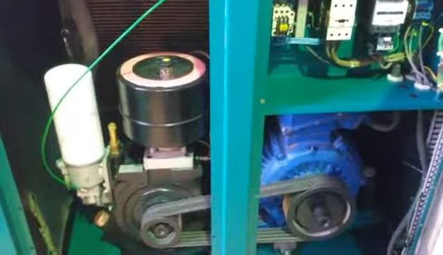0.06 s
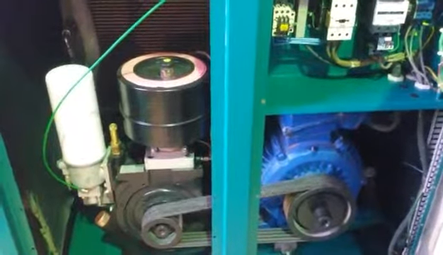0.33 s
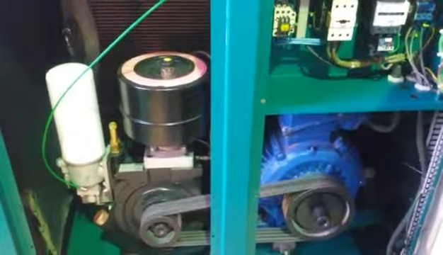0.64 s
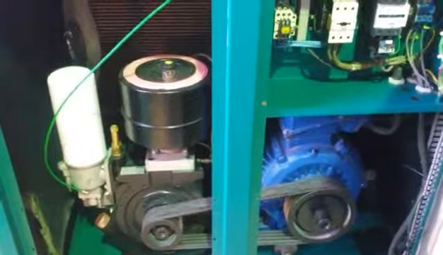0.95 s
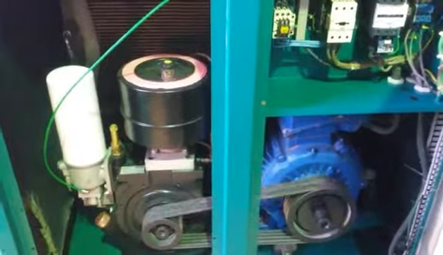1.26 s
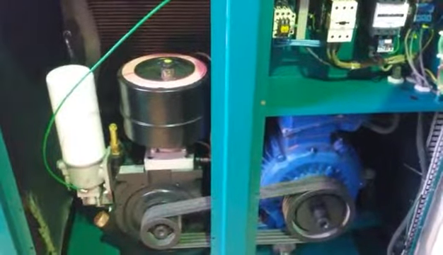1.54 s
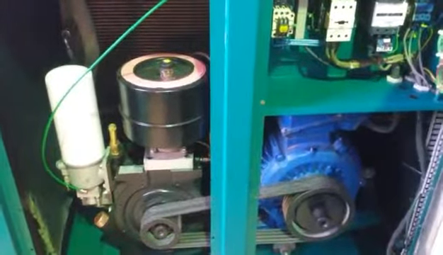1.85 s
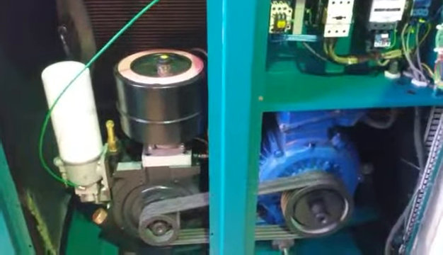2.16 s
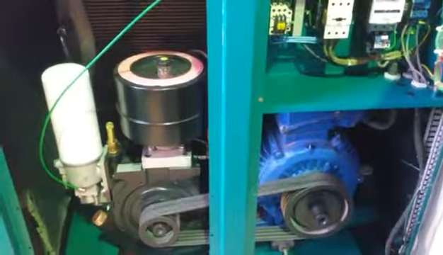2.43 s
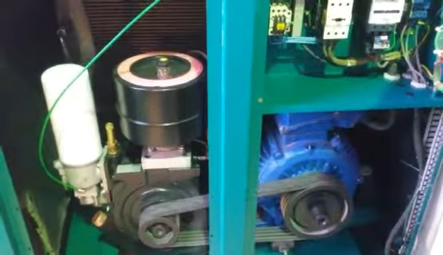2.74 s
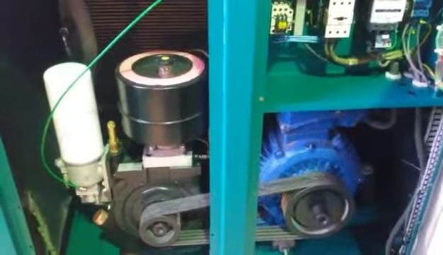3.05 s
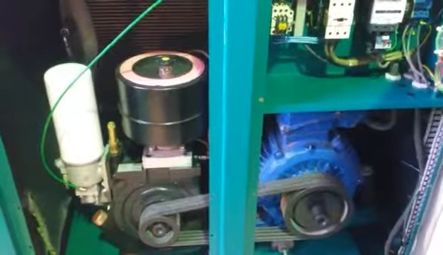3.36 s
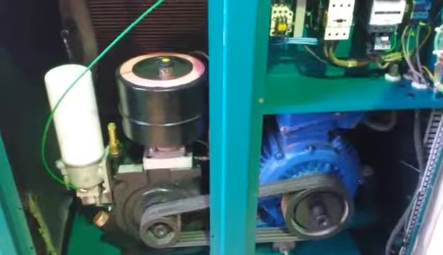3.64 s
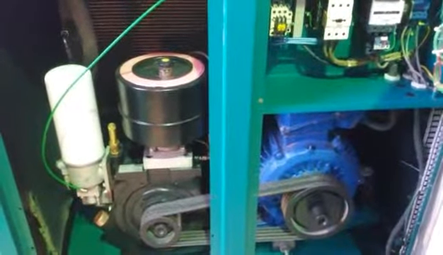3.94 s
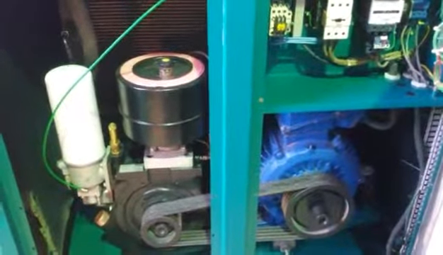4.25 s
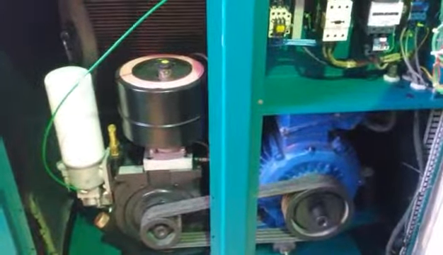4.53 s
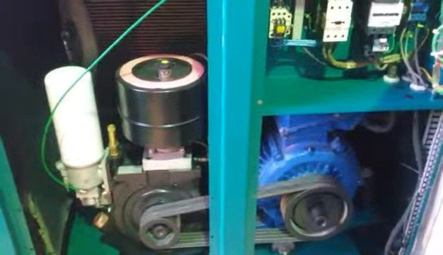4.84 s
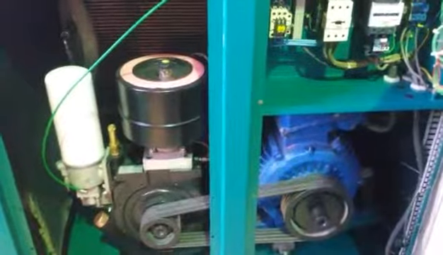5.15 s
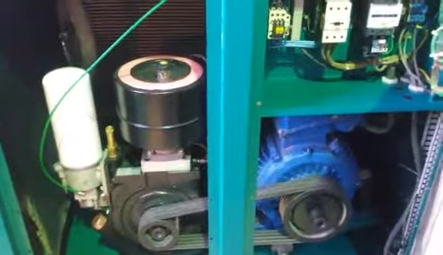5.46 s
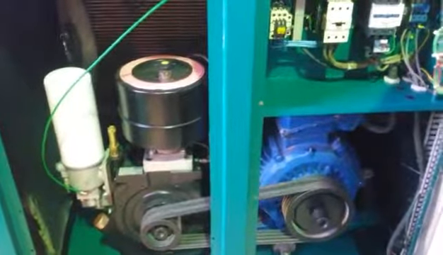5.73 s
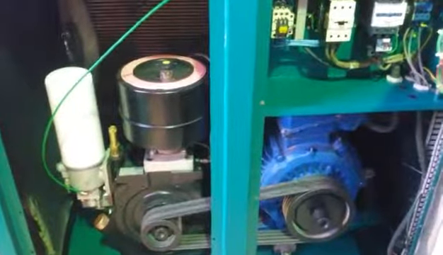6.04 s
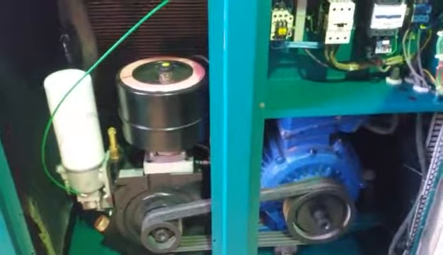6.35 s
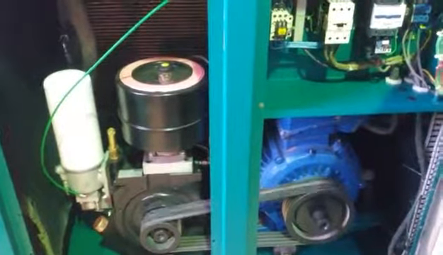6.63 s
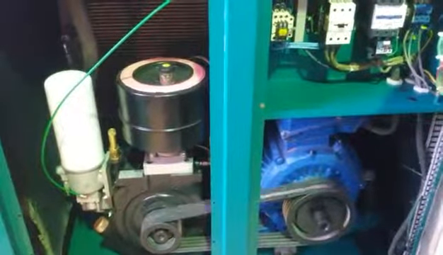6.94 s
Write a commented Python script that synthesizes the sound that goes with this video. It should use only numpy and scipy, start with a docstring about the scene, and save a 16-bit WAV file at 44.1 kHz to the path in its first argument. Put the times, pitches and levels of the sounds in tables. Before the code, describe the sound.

From the start, a belt-driven air compressor runs loudly and steadily in an open steel cabinet, heard from nearby. A firm mid-pitched drone sits under a piercing high whine that throbs slightly, about four times a second. Beneath them are a softer motor hum and the constant rush of fan and air. Nothing much changes until about 5.7 seconds, when a power switch opens with one sharp clack and a short ring from the metal walls. The steady drone drops away at once and the machine begins to spin down. Its tones and whine glide lower, swelling and dipping as they fall, while the rotors take on a rough chatter. From about 6.6 seconds the falling tone sets the cabinet booming. The machine is still slowing at 7 seconds.

```python
"""An air compressor switches off

A belt-driven screw compressor runs in an open steel cabinet. The ridges (lobes) of its rotors pump out a steady
tone, and rotors, bearings and motor whine over the rush of fan and air. A power switch clacks open; everything
slows down, and the falling tone sets the cabinet booming."""
import sys
import numpy as np
from scipy import signal
from scipy.fft import rfft, irfft, next_fast_len
from scipy.io import wavfile
from scipy.ndimage import map_coordinates

SR = 44100
rng = np.random.default_rng(int(sys.argv[2]) if len(sys.argv) > 2 else 0)


def unload_audio(sound):
    """Save the sound as a 16-bit wav file, at the path given as the first command line argument."""
    columns = np.transpose(np.atleast_2d(sound))
    # keep every value between -1 and 1, then stretch to whole-number steps
    steps = np.round(np.clip(columns, -1, 1) * 32767)
    wavfile.write(sys.argv[1], SR, steps.astype(np.int16))


N = 308259
T = np.arange(N) / SR
FULL_SPEED_HZ = 441.06  # lobes passing the outlet each second
MESH_ORDER = 9.4  # pitch of the interlocking (meshing) rotors, as a multiple of the lobe rate


def gain_of(db):
    return 10 ** (np.asarray(db) / 20)


def unit_level(x):
    return x / np.sqrt(np.mean(x ** 2) + 1e-20)


def curves(rows):
    """Join a table's points with straight lines in time, one curve per column."""
    times, *columns = np.transpose(rows)
    return [np.interp(T, times, column) for column in columns]


def wander(hz):
    """A smooth random wobble that changes about hz times a second."""
    knots = rng.standard_normal(1000)
    return unit_level(map_coordinates(knots, [T * hz], order=2, mode="mirror"))


def resonate(x, hz, width_hz):
    """Ring at one pitch; a narrower width rings longer."""
    r = np.exp(-np.pi * width_hz / SR)
    return 2 * signal.lfilter([1 - r], [1, -r * np.exp(2j * np.pi * hz / SR)], x).real


def echoes(x, wet, t60):
    """Add echoes from the steel walls, fading by 60 dB in t60 seconds."""
    t = T[:SR // 2]
    tail = rng.standard_normal(len(t)) * gain_of(-60 * t / t60) * (t > .003)
    return (x + wet * signal.fftconvolve(x, tail / np.linalg.norm(tail))[:N]) / np.hypot(1, wet)


def tones(rows, rotation, waver_db, slip):
    """Tones that follow a rotation, each wavering in level and slipping a little in phase."""
    return sum(gain_of(db + waver_db * wander(9)) * np.sqrt(2)
               * np.sin(2 * np.pi * (rate * rotation + rng.random()) + slip * wander(7))
               for rate, db in rows)


def rush(spectrum, flutter_db):
    """Shaped rushing noise that flutters slightly."""
    hz, db = np.transpose(spectrum)
    size = next_fast_len(N)
    colour = gain_of(np.interp(np.log(np.fft.rfftfreq(size, 1 / SR) + 1), np.log(hz), db))
    air = irfft(rfft(rng.standard_normal(size)) * colour, size)[:N] * np.sqrt(SR / 2)
    return air * gain_of(flutter_db * wander(25))


def fan_and_air(load, swell):
    """The rush of fan and air changes colour as the load comes off."""
    # steady rushing noise, its treble cut away around 10 kHz: f/Hz, level/dB per Hz
    steady = [(25, -80), (48, -73.5), (72, -54.5), (300, -55), (440, -57), (600, -62), (800, -60.5),
              (1120, -57.5), (2100, -61.5), (2700, -65.5), (5200, -61.5), (7300, -72), (9200, -74),
              (10300, -98), (11800, -88), (12600, -79), (13500, -110)]
    # rushing noise while slowing: f/Hz, level/dB per Hz
    slowing = [(25, -78), (50, -76), (75, -59), (130, -50.5), (200, -59.5), (380, -53), (680, -70),
               (880, -58.5), (1300, -61), (2700, -67), (5000, -61), (8000, -73), (11000, -79.5),
               (13500, -95)]
    return (rush(steady, flutter_db=.5) * np.sqrt(load) * swell
            + rush(slowing, flutter_db=1.0) * np.sqrt(1 - load))


def motor_hum(run_s, load):
    """Belt, pulleys and motor hum, more softly without load."""
    # hum tones at full speed: f/Hz, level/dB
    hum = [(172.6, -34.5), (247.4, -41.5), (306.8, -34.5), (705.4, -50.5), (1017, -45), (1103.5, -40.5),
           (1176, -46), (1234, -46.5), (1411, -47), (2029, -41)]
    return tones(hum, run_s, waver_db=2.1, slip=0.48) * (load + .35 * (1 - load))


def power_switch():
    """The switch opens, hits its stop and bounces, ringing a plastic case that dulls the top treble."""
    # blows: t/s, level/dB
    clacks = [(5.6855, -11), (5.691, -11.5), (5.698, -15.5)]
    # ringing pitches of the case: f/Hz, width/Hz, relative level/dB
    modes = [(1050, 200, -4), (1640, 200, 5), (2500, 700, -4), (5200, 2500, -7), (8500, 2500, -14)]
    decay_s, top_hz = .0075, 7500
    blows = sum(gain_of(db) * (T >= s) * np.exp(-abs(T - s) / decay_s) for s, db in clacks)
    grit = signal.sosfilt(signal.butter(4, top_hz, fs=SR, output="sos"), rng.standard_normal(N))
    case = unit_level(sum(gain_of(db) * resonate(grit, hz, width) for hz, width, db in modes))
    return echoes(case * blows, wet=0.27, t60=0.58)


def cabinet_boom(puffs, load):
    """The falling lobe tone passes the pitch of the cabinet's air, which swells slowly and rings on."""
    air = np.sqrt(2) * np.sin(2 * np.pi * puffs) * (1 - load)
    for _ in range(3):
        air = resonate(air, hz=236, width_hz=7)
    return gain_of(-6) * air


def slowing_lobes(puffs, load):
    """The falling lobe tones swell and dip as they pass the pitches at which the room rings."""
    # falling tones: t/s, then level/dB at 1, 2, 3 and 4 times the lobe rate
    levels = [(5.7, -24, -42, -34, -53), (5.78, -24, -39, -31, -34), (5.84, -21, -40, -29, -30),
              (5.9, -14.5, -34, -30, -40), (5.98, -34, -36, -23.5, -49), (6.04, -16.5, -50, -25, -46),
              (6.1, -26.5, -35, -31, -45), (6.2, -26.5, -45, -31.5, -46), (6.28, -22.5, -41.5, -37, -37),
              (6.36, -27, -41, -27, -33), (6.41, -33, -46, -47, -28), (6.47, -21, -48, -46, -38),
              (6.57, -37, -41, -34, -41), (6.68, -24.5, -32.5, -46, -48), (6.78, -33, -26.5, -44, -46),
              (6.87, -32, -28, -42, -50), (6.99, -34, -30, -45, -46)]
    falling = sum(gain_of(db + 1.8 * wander(35)) * np.sqrt(2) * np.sin(2 * np.pi * multiple * puffs)
                  for multiple, db in enumerate(curves(levels), start=1))
    return echoes(falling * (1 - load), wet=0.58, t60=0.59)


def pumping_lobes(puffs, load):
    """Each lobe pushes out a puff of air; the fast puffs blend into a steady tone."""
    # softer tones: multiple of the lobe rate, level/dB
    soft = [(1, -31), (4, -39), (5, -34.5), (6, -56)]
    # firm drone an octave up: multiple of the lobe rate, level/dB
    drone = [(2, -18)]
    return (tones(soft, puffs, waver_db=1.17, slip=.04)
            + tones(drone, puffs, waver_db=-0.1, slip=.03)) * load


def whine(run_s, load):
    """Rotors, bearings and the electric motor whine; tones very close in pitch throb four times a second."""
    # throbbing tones at full speed: f/Hz, level/dB
    throbbing = [(4143.4, -22.3), (4145.6, -31), (4147.4, -21)]
    # whine tones around them: f/Hz, level/dB
    around = [(3860.5, -37), (3991.5, -30), (3993.5, -33), (4093.5, -27.5), (4122.5, -34), (4165.5, -27),
              (4192.7, -28), (4299, -29), (4321, -33), (4495.5, -38), (4827.8, -35.5)]
    return (tones(around, run_s, waver_db=4.4, slip=0.4)
            + tones(throbbing, run_s, waver_db=-0.06, slip=0.2)) * load


def surface_flaws(puffs, harmonic, spread, rough):
    """Flaws repeat whenever the same lobes meet: evenly spaced tones, with noise between them."""
    # band around a mesh tone at full speed: offset/Hz (before spread stretches it), relative level/dB
    band = [(-1500, -27), (-750, -19), (-500, -7), (-250, -3.5), (5, -3.5), (250, -1), (443, -8.5),
            (744, -9), (1098, -25.5), (1900, -56)]
    size, repeat_hz = 4096, 22.047
    place = puffs / FULL_SPEED_HZ * repeat_hz * size

    def track(rounds):
        """A loop of surface: a short one sounds like tones, a long one like noise."""
        hz = np.arange(size * rounds // 2 + 1) * repeat_hz / rounds
        offset_hz = hz - harmonic * MESH_ORDER * FULL_SPEED_HZ
        shape = gain_of(np.interp(offset_hz / spread, *np.transpose(band), left=-120, right=-120))
        surface = unit_level(irfft(shape * np.exp(2j * np.pi * rng.random(len(shape)))))
        return np.interp(place % len(surface), np.arange(len(surface)), surface)
    return (track(rounds=1) + rough * track(rounds=160)) / np.hypot(1, rough)


def meshing_rotors(puffs, load):
    """The rotors whine evenly under load; without it they chatter and their higher bands grow."""
    # rotor noise: t/s, then base level/dB of the low, middle and high band
    band_levels = [(0, -17.5, -34, -56), (1.8, -18.5, -34.5, -60), (3.2, -18, -34, -58),
                   (5.65, -16.5, -32, -66), (5.8, -17.5, -38, -44), (6, -17, -32, -37),
                   (6.18, -18.5, -28, -35), (6.4, -31, -25.5, -35), (6.58, -30, -22, -37),
                   (6.75, -34, -23.5, -30), (6.87, -28, -19, -19), (6.99, -32, -32, -16.5)]
    # clear tone while slowing, flaring where the casing rings along: t/s, level/dB
    clear_level = [(5.7, -48), (5.76, -21), (5.79, -10.5), (5.83, -15), (5.9, -20), (5.98, -15.5),
                   (6.06, -32), (6.14, -17.5), (6.2, -24), (6.26, -34), (6.45, -33), (6.53, -30),
                   (6.58, -24), (6.65, -43), (6.99, -55)]
    low, middle, high = map(gain_of, curves(band_levels))
    loaded = (low * surface_flaws(puffs, harmonic=1, spread=1.02, rough=0.53)
              + middle * surface_flaws(puffs, harmonic=2.005, spread=0.83, rough=0.95))
    chatter = (low * gain_of(-1.5) * surface_flaws(puffs, harmonic=1.011, spread=0.75, rough=0.84)
               + middle * gain_of(0.3) * surface_flaws(puffs, harmonic=1.967, spread=0.97, rough=1.2)
               + high * gain_of(-5.0) * surface_flaws(puffs, harmonic=2.92, spread=1.6, rough=1.5))
    phase = 2 * np.pi * MESH_ORDER * puffs + .4 * wander(60)
    clear = gain_of(curves(clear_level)[0]) * np.sqrt(2) * np.sin(phase)
    chatter *= gain_of(1.2 * wander(70))
    slowing = echoes(chatter, wet=0.56, t60=0.59) + echoes(clear, wet=0.55, t60=0.22)
    return loaded * np.sqrt(load) * gain_of(0.97 * wander(9.3)) + slowing * np.sqrt(1 - load)


def scene():
    """Mix all the sounds; the moving parts share one speed and one load."""
    # how fast lobes pass the outlet: t/s, f/Hz
    speed = [(0, 441.06), (5.69, 441.06), (5.8, 418), (6, 373), (6.2, 330), (6.4, 286), (6.6, 244),
             (6.8, 206), (6.99, 173)]
    # how hard the machine works: t/s, load from 0 to 1
    effort = [(0, 0.98), (5.69, 0.93), (5.75, 0.44), (5.81, 0.14), (5.9, 0)]
    # slow swell around the average level: t/s, relative level/dB
    swell_points = [(0.0, -19), (0.3, -17), (0.44, -18.5), (0.93, -17.5), (1.16, -19), (1.34, -18.5),
                    (2.05, -19.5), (2.09, -19.5), (2.36, -19.5), (5.59, -17.5), (5.65, -18.5)]
    lobe_hz, = curves(speed)
    load, = curves(effort)
    swell_db, = curves(swell_points)
    swell = gain_of(swell_db - swell_db.mean())
    puffs = np.cumsum(lobe_hz * (1 + .00012 * wander(5.09))) / SR  # lobes passed so far
    run_s = puffs / FULL_SPEED_HZ  # rotation, counted in seconds at full speed
    running = (pumping_lobes(puffs, load) + motor_hum(run_s, load) + whine(run_s, load)) * swell
    air = fan_and_air(load, swell)
    rotors = meshing_rotors(puffs, load)
    stopping = slowing_lobes(puffs, load) + cabinet_boom(puffs, load) + power_switch()
    return (air + running + rotors + stopping)[None]


def record(dry):
    """Round off the loudest peaks, then cut the highest treble."""
    ceiling, top_hz = .97, 13500
    rounded = dry / (1 + (dry / ceiling) ** 8) ** (1 / 8)
    treble_cut = signal.firwin(511, top_hz, window=("kaiser", 9), fs=SR)
    return signal.oaconvolve(rounded, treble_cut[None], "same")


dry = scene()
out = record(dry)
unload_audio(out)
```